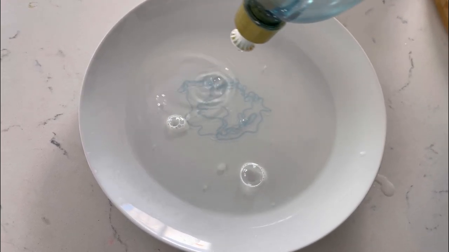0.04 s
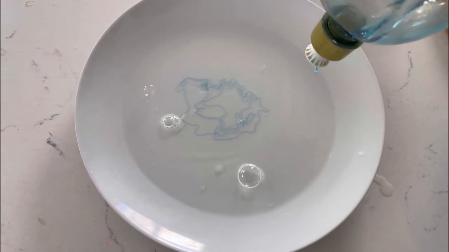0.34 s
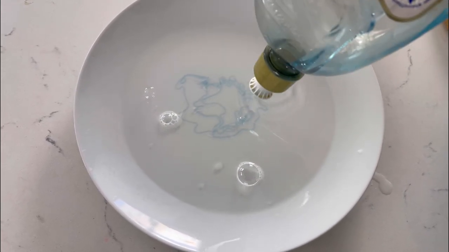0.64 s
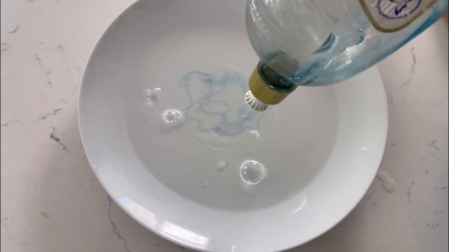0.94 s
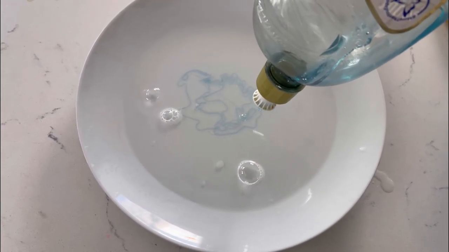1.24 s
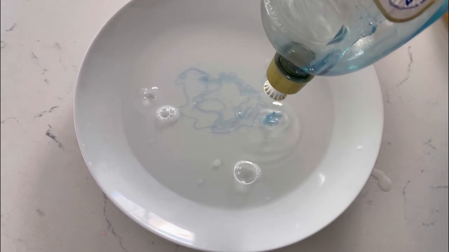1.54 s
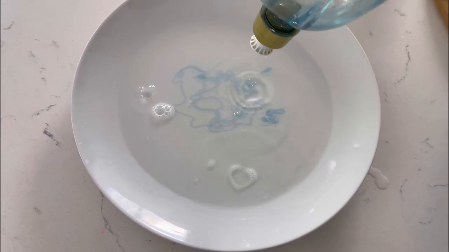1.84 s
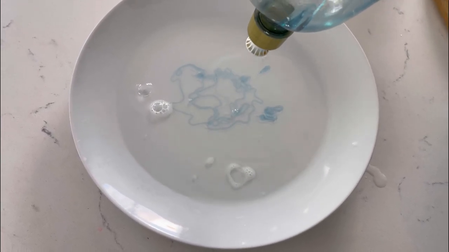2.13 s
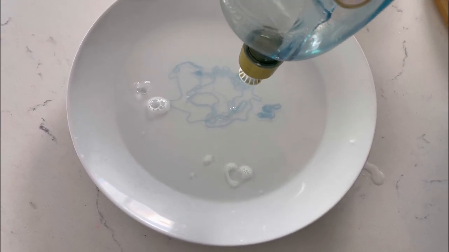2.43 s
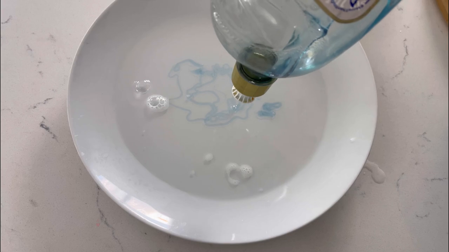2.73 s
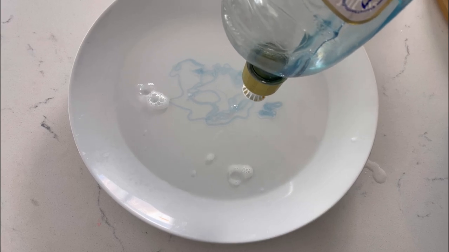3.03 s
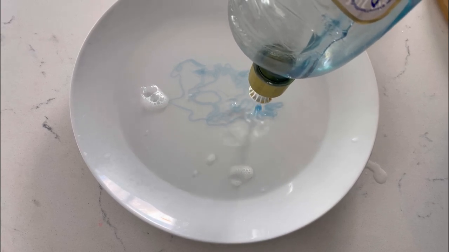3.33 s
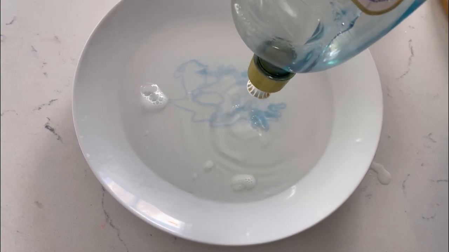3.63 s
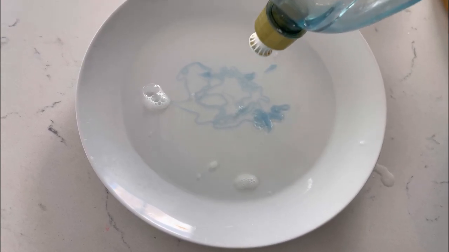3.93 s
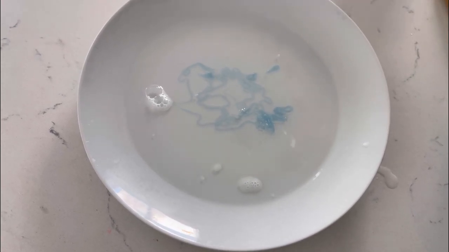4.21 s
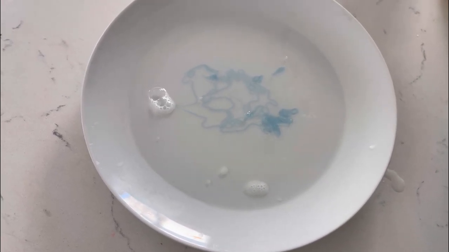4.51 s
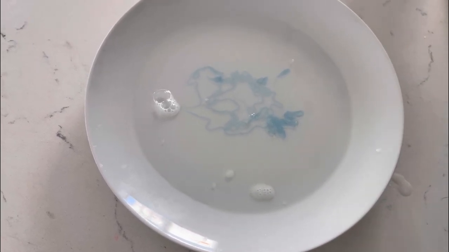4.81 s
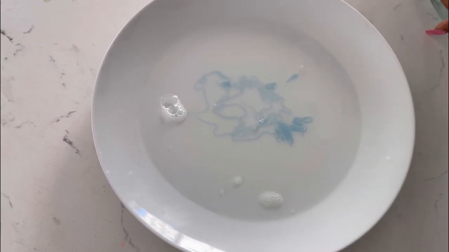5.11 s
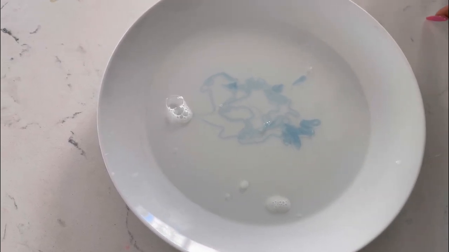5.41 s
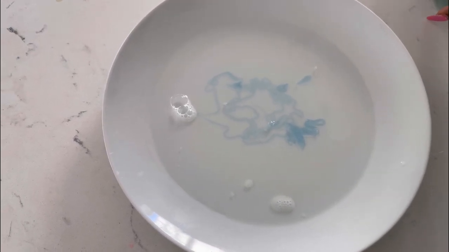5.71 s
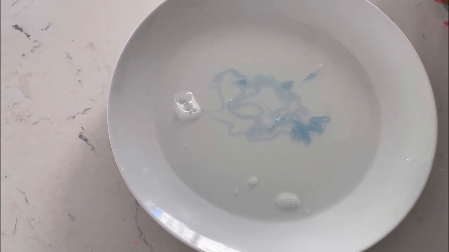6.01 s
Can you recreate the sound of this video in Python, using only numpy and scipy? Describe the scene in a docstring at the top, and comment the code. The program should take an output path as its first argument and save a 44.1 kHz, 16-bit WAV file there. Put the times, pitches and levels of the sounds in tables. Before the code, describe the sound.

In a kitchen with a faint low rumble, soap and air spit from a plastic bottle into shallow water, very near the microphone. The bottle wall gives dull pops and one loud click before a second, crackling squirt. As the grip eases, air hisses and whistles thinly back in. The bottle is set down on the counter with a thud, and a few more hollow knocks follow as another is bumped.

```python
"""At a kitchen counter, a nearly empty plastic bottle of washing-up liquid is squeezed over a plate of water.
Close to the microphone, soap and air sputter from the nozzle and churn the water, and the thin wall
buckles with dull pops. As the grip eases, air is drawn back in, hissing and whistling in the slit.
The bottle is set down and another is knocked about; each impact rings the modes of the counter.
Short reflections and a low background rumble surround it all."""
import sys
import numpy as np
from scipy import signal
from scipy.fft import rfft, irfft
from scipy.io import wavfile
from scipy.ndimage import uniform_filter1d, map_coordinates

SR = 44100
rng = np.random.default_rng(int(sys.argv[2]) if len(sys.argv) > 2 else 0)


def inscribe(sig):
    """Save sig as 16-bit PCM at rate SR to the path in sys.argv[1].

    A 1-D sig is mono; a 2-D sig holds one channel per row.
    Samples are clipped to [-1, 1] before scaling.
    """
    pcm = np.round(np.clip(np.atleast_2d(sig).T, -1, 1) * 32767)
    wavfile.write(sys.argv[1], SR, pcm.astype(np.int16))


N = 266893
TIME, HZ = np.arange(N) / SR, np.fft.rfftfreq(N, 1 / SR)
BAND_LIMIT_HZ = 15900

# squeezes of the bottle: start_s, length_s, full_pressure_s, soap_db, air_db
SQUEEZES = [(0, .13, 0.0024, -53, -57.5), (1.431, 0.033, 0.071, -28.5, -32),
            (1.509, 0.34, 0.01, -27, -27.5), (3.267, 0.47, 0.11, -27.5, -26.5)]
# hollow resonances of the neck: centre_hz, width_hz, boost_db
NECK_MODES = [(316, 220, 15), (825, 45, 12), (3500, 20, 6.5), (3940, 110, 13.5), (5850, 600, -3.5)]
# spectra of the sputtering soap and the escaping air: frequency_hz, level_db
SPUTTER_SPECTRUM = [(50, -37), (130, -4), (300, -1.5), (600, -0.5), (1300, -3.5), (2200, -7), (4500, -10.5),
                    (7000, -15.5), (10000, -10.5), (16000, -39)]
HISS_SPECTRUM = [(1000, -27), (3000, -13.5), (5300, -15), (7200, -5), (8500, 1), (9800, 2), (11500, -6.5),
                 (13500, -9), (16000, -26)]
# soap films bursting in the nozzle: start_s, level_db, pitch_hz
FILM_BURSTS = [(3.2691, -8, 8500), (3.3502, 0, 4550), (3.355, -3.5, 5700), (3.3782, -3, 7000),
               (3.417, -3, 7150), (3.4425, -6, 6000)]
# buckles of the wall: start_s, thud_db, thud_hz, sag_exponent, click_db
BUCKLES = [(0.2861, -25, 254.7, 0.04, -54.5), (.802, -28.5, 249, 0.01, -48.5), (0.885, -35, 183, 0.42, -70),
           (1.883, -32, 126, 0.66, -46), (1.9287, -31.5, 131, 0.62, -66), (2.125, -24, 208, 0.23, -47.5),
           (2.732, -22, 191.5, 0, -56.5), (2.7517, -12.5, 241.7, 0.01, -12.5), (3.067, -42, 559, 0.03, -84)]
# dry ticks of the plastic: start_s, level_db, pitch_hz
TICKS = [(0.2843, -54, 8500), (0.3256, -53.5, 8800), (0.729, -44.5, 2800), (1.8822, -34, 5000),
         (2.7367, -48, 7000), (2.7485, -16, 1690), (2.75, -30.5, 6010), (3.909, -44.5, 1900),
         (5.0494, -36.5, 7630), (5.434, -51, 2550), (5.7787, -39, 1965)]
# short sips of air: start_s, length_s, lower_db, lower_first_hz, lower_last_hz, upper_db
SIPS = [(1.86, 0.082, -50.5, 7700, 7500, -57.5), (2.329, 0.17, -54, 5400, 5000, -49),
        (2.369, 0.055, -47.5, 6000, 2056, -84), (3.878, 0.033, -56.5, 6700, 6500, -61.5),
        (5.263, 0.11, -50.5, 5940, 5660, -53.5)]
# long intake through the nozzle's two resonances: time_s, lower_relative_db, upper_relative_db
INTAKE_LEVELS = [(4.08, -75, -96), (4.12, -60, -70), (4.178, -61, -72), (4.28, -55, -49.5),
                 (4.308, -48.5, -55.5), (4.428, -64.5, -64.5), (4.47, -49.5, -52.5), (4.53, -53.5, -59.5),
                 (4.622, -50, -44.5), (4.644, -50.5, -35.5), (4.72, -49.5, -34.5), (4.794, -45, -44.5),
                 (4.864, -48.5, -39), (5.01, -55, -70), (5.026, -59.5, -61.5), (5.22, -68.5, -91)]
# glide of the lower resonance: time_s, centre_hz
INTAKE_GLIDE = [(4.1, 7990), (4.47, 7300), (4.592, 5780), (4.702, 6750), (4.724, 7260), (4.95, 7430),
                (5.2, 5450)]
# spectra of the broad rush and high fizz of inflowing air: frequency_hz, level_db
RUSH_SPECTRUM = [(100, -7), (600, 6.5), (1500, -2.5), (3200, 4), (4800, -2), (7000, 2.5), (10000, -6.5),
                 (12000, -22.5), (16000, -45)]
FIZZ_SPECTRUM = [(7000, -47), (10500, 5), (13000, -1.5), (16000, -27)]
# edge tones of the slit: middle_s, half_length_s, pitch_hz, glide_hz_per_s, level_db
WHISTLES = [(2.449, 0.0056, 5070, -2800, -43), (4.161, 0.037, 3998, 15, -46),
            (4.282, 0.037, 3997, 3.5, -46.5), (4.367, 0.043, 3992, -2, -63), (4.52, .05, 6700, -12000, -62),
            (4.936, 0.01, 2850, -2500, -55.5), (5.107, 0.03, 4500, -12000, -72)]
# bottles striking the counter: start_s, thud_db, thud_hz, swell_s, crack_db, crack_hz, tick_db, ring_db
KNOCKS = [(4.651, -6, 290.6, 0.0057, -12, 1077, -60, -15), (5.125, -26.5, 288, 0.007, -32, 700, -58, -47),
          (5.2567, -8.5, 356, .0036, -7.5, 770, -17.5, -36.5),
          (5.5849, -13.5, 268, 0.0056, -15, 772, -18, -51), (5.6119, -17.5, 131, 0.0082, -9, 833, 3, -24),
          (6.007, -47.5, 400, 0.0057, -39, 810, -73, -47)]
# modes of the counter and plate: pitch_hz, level_db, t60_s
COUNTER_MODES = [(183.2, 2.5, 0.18), (313.4, 7, 0.091), (630, -7.5, 0.1), (672, -9, 0.071),
                 (819, -2.5, 0.12), (1150, -1, 0.043), (1530, -44, 0.57), (2190, -22.5, 0.15)]
# weak top octave of struck plastic: frequency_hz, gain_db
KNOCK_ROLLOFF = [(10300, -2), (12000, -20), (16000, -35.5)]
# spectrum of things sliding on the counter: frequency_hz, level_db
RUB_SPECTRUM = [(40, -5), (130, 7), (350, 6), (700, -4), (1500, -16), (4000, -31.5), (12000, -26)]
# the jet churning the water: start_s, length_s, level_db
GURGLES = [(1.533, 0.16, -38), (3.407, 0.11, -45.5), (3.532, 0.044, -37.5), (3.598, 0.023, -36.5)]
# reverberation time of the kitchen: frequency_hz, t60_s
ROOM_DECAY = [(100, 1), (300, 0.84), (1000, 0.47), (4000, 0.58), (9000, 0.12), (16000, 0.34)]
# spectrum of the background rumble: frequency_hz, level_db
RUMBLE_SPECTRUM = [(12, -63.5), (20, -28), (34, -14.5), (49, 1), (82, -4.5), (115, -1), (135, -6.5),
                   (249, -8), (367, -19.5), (555, -25), (733, -24.5), (1310, -36), (3270, -49),
                   (15000, -57)]
# phase between the microphone ports: frequency_hz, left_lead_rad
PORT_PHASE = [(0, 0), (520, -.2), (780, -1.6), (1120, 0), (2000, .1), (2800, 1), (4000, .6), (4500, 1.3),
              (5400, 5.7), (6200, 6.5), (9500, 9.42), (12000, 12.5), (13500, 12.7), (15200, 15.6)]
# balance of the ports: frequency_hz, left_minus_right_db
PORT_BALANCE = [(100, -1.5), (500, -2), (850, -4), (1500, -2), (3500, -1.5), (4800, -4.5), (6000, -1),
                (16000, 0.5)]


def squirts(drops_per_s=1200, spread_db=3, flutter_db=1.5, pocket_hz=3400, wet_slit_hz=6100):
    """Jet break-up: soap tears into droplets that ring the neck; as it runs out, turbulent hiss is left."""
    soap, air = nozzle_flows()
    sizes = gain_of(spread_db * np.minimum(rng.exponential(1, N), 4)) * rng.choice([-1, 1], N)
    drops = unit_rms(sizes * (rng.random(N) < drops_per_s / SR))
    neck_db = sum(db / (1 + (2 * (HZ - hz) / width) ** 2) for hz, width, db in NECK_MODES)
    sputter = colour(drops + 0.54 * rng.standard_normal(N), curve_at(SPUTTER_SPECTRUM, HZ) + neck_db)
    # air pockets between the soap films keep changing size and pitch
    sputter += gain_of(-10) * resonate(drops, pocket_hz * np.exp(0.34 * drift(25)), width_hz=700)
    # the slit resonates higher as it blows itself dry
    dryness = (air / (air + soap + 1e-12)) ** 8
    slit_hz = wet_slit_hz * (1 + np.minimum(dryness, 0.25))
    slit = resonate(rng.standard_normal(N), slit_hz, width_hz=1100)
    # the top of the hiss needs full pressure and goes first
    hiss = dulled(noise(HISS_SPECTRUM), (air / air.max()) ** 0.75, corner_hz=12000)
    choking = unit_rms(gain_of(flutter_db * drift(60)))  # soap blocks and frees the opening
    return soap * sputter * choking + air * (hiss + gain_of(-7) * slit) * np.sqrt(choking)


def nozzle_flows(soap_fall_db_per_s=102, air_fall_db_per_s=56.5):
    """Pressure-driven flow: soap and air hold steady, then decay exponentially, the soap sooner."""
    soap, air = np.zeros(N), np.zeros(N)
    for start, length, full_pressure_s, soap_db, air_db in SQUEEZES:
        grip = envelope(start, length, attack_s=0.002, release_s=0.045 * length)
        falling_s = np.maximum(TIME - start - full_pressure_s, 0)
        soap += grip * gain_of(soap_db - soap_fall_db_per_s * falling_s)
        air += grip * gain_of(air_db - air_fall_db_per_s * falling_s)
    return soap, air


def film_bursts(puff_db=-17):
    """Film rupture: each bursting soap film gives a sharp spit and frees a low puff of air."""
    out = np.zeros(N)
    for start, db, hz in FILM_BURSTS:
        add(out, start, gain_of(db) * snap(hz, decay_s=0.00079, q=2.2, top_hz=11500))
        add(out, start, gain_of(db + puff_db) * snap(600, decay_s=0.0071, q=0.8, top_hz=5000))
    return out


def wall_pops(swell_cycles=1.8, click_ratio=4.8, click_lead_s=0.0027):
    """Buckling: the wall ticks and pops, short bending waves running ahead of each thud as a click."""
    out = np.zeros(N)
    for start, db, hz, sag, click_db in BUCKLES:
        add(out, start, gain_of(db) * thud(hz, swell_cycles / hz, sag))
        click = thud(click_ratio * hz, swell_s=0.0012, sag=0.033)
        add(out, start - click_lead_s, gain_of(click_db) * click)
    for start, db, hz in TICKS:
        add(out, start, gain_of(db) * snap(hz, decay_s=0.0011, q=1.2, top_hz=min(2.6 * hz, 10800)))
    return out


def intake(upper_hz=10150, width_hz=2200, fade_start_s=4.52, fade_db_per_s=100, flutter_db=1.35):
    """Elastic recoil: the wall pulls air through two resonances of the nozzle, the lower one gliding."""
    times, lower_curve, upper_curve = np.transpose(INTAKE_LEVELS)
    lower_flow, upper_flow = gain_curve(times, lower_curve + 5), gain_curve(times, upper_curve + 8)
    lower_hz = np.interp(TIME, *np.transpose(INTAKE_GLIDE))
    lower = lower_flow * resonate(rng.standard_normal(N), lower_hz, width_hz)
    for start, length, lower_db, first_hz, last_hz, upper_db in SIPS:
        sip = envelope(start, length, attack_s=0.045, release_s=0.02)
        sip_hz = np.interp(TIME, [start, start + length], [first_hz, last_hz])
        lower += gain_of(lower_db) * sip * resonate(rng.standard_normal(N), sip_hz, width_hz)
        lower_flow += gain_of(lower_db) * sip
        upper_flow += gain_of(upper_db) * sip
    # the highest fizz fades and the intake's hiss grows duller toward its end
    brightness = gain_of(-fade_db_per_s * np.maximum(TIME - fade_start_s, 0))
    upper = resonate(rng.standard_normal(N), np.full(N, upper_hz), width_hz)
    upper += gain_of(-3) * brightness * noise(FIZZ_SPECTRUM)
    rush = gain_of(-8) * noise(RUSH_SPECTRUM)
    direct = dulled(lower + upper_flow * upper + lower_flow * rush, brightness, corner_hz=11400)
    return with_counter_echo(direct) * gain_of(flutter_db * drift(31))


def whistles(octave_db=-14):
    """Edge tones: air in the slit oscillates at a slightly unsteady pitch, with a weak octave."""
    out, waver = np.zeros(N), 1 + 0.005 * drift(300)
    for middle, half_length, hz, glide, db in WHISTLES:
        t = TIME - middle
        phase = 2 * np.pi * np.cumsum((hz + glide * t) * waver) / SR
        tone = unit_rms(np.sin(phase) + gain_of(octave_db) * np.sin(2 * phase))
        out += gain_of(db) * np.exp(-(t / half_length) ** 4) * tone
    return out


def knocks(detune=0.055):
    """Impact excitation: the base cracks on stone, the bottle thuds and the counter's modes ring on."""
    out, t = np.zeros(N), np.arange(SR) / SR
    for start, thud_db, thud_hz, swell_s, crack_db, crack_hz, tick_db, ring_db in KNOCKS:
        ring = np.zeros(SR)
        for hz, db, t60 in COUNTER_MODES:
            spot_hz = hz * (1 + detune * rng.uniform(-1, 1))  # each spot rings a little differently
            ring += gain_of(db - 60 * t / t60) * np.sin(2 * np.pi * spot_hz * t)
        add(out, start, gain_of(thud_db) * thud(thud_hz, swell_s, sag=0.17))
        add(out, start, gain_of(crack_db) * thud(crack_hz, swell_s=0.002108, sag=0.33))
        add(out, start, gain_of(crack_db - 2) * snap(crack_hz, decay_s=0.0042, q=4.7, top_hz=9720))
        add(out, start, gain_of(tick_db) * snap(7200, decay_s=0.00037, q=0.4, top_hz=11700))
        add(out, start, gain_of(ring_db) * ring * (1 - np.exp(-t / 0.003)))
    return out


def gurgles(low_hz=280, high_hz=560, each_size_per_s=14, decay_s=0.006, rise_per_s=5):
    """Bubble resonance: each size rings a short note that rises as the bubble nears the surface."""
    t, water = np.arange(SR // 16) / SR, np.zeros(N)
    for hz in np.geomspace(low_hz, high_hz, num=16):
        bubble = np.exp(-t / decay_s) * np.sin(2 * np.pi * hz * t * (1 + rise_per_s * t)) / hz
        water += signal.oaconvolve(rng.random(N) < each_size_per_s / SR, bubble)[:N]
    churning = sum(gain_of(db) * envelope(start, length, attack_s=0.043, release_s=0.012)
                   for start, length, db in GURGLES)
    return unit_rms(water) * churning


def scuffs(start_s=4.996, length_s=0.74):
    """Sliding friction: hands shift things on the counter with a low, uneven rub."""
    rub = noise(RUB_SPECTRUM) * gain_of(3 * drift(30))
    return gain_of(-44.5) * envelope(start_s, length_s, attack_s=0.35, release_s=0.089) * rub


def with_counter_echo(direct, rest_m=0.08, lift_s=4.2, lift_m_per_s=0.2, sway_m=0.003, reflection=0.45):
    """Comb filtering: the echo off the counter lags more as the bottle rises, so the peaks slide down."""
    height_m = rest_m + lift_m_per_s * np.maximum(TIME - lift_s, 0) + sway_m * drift(7.8)
    delay_samples = 2 * height_m / 343 * SR
    echo = reflection * map_coordinates(direct, [np.arange(N) - delay_samples], order=3)
    return (direct + echo) / 2


def reverberation(x, reflections_per_s=4000, stereo_width=0.89):
    """Diffuse field: dense reflections die at each band's own rate; the bass is alike at both ports."""
    taps = rng.standard_normal((2, SR)) * (rng.random((2, SR)) < reflections_per_s / SR)
    hz, frame_s, bands = signal.stft(taps, SR, nperseg=256)
    bands[1] *= (stereo_width * hz ** 2 / (hz ** 2 + 500 ** 2))[:, None]
    bands *= gain_of(-60 * frame_s / curve_at(ROOM_DECAY, hz)[:, None])
    tail = signal.istft(bands, SR, nperseg=256)[1][:, :SR]
    t = np.arange(SR) / SR
    # the counter and nearby wall answer first and loudest
    tail *= np.clip(t / 0.0013, 0, 1) * (1 + 3.8 * np.exp(-t / 0.034))
    mid, side = signal.fftconvolve(x[None], tail / np.linalg.norm(tail[0]), axes=1)[:, :N]
    return np.array([mid + side, mid - side])


def rumble(level_db=-55.5):
    """Ambient noise: a steady low rumble, almost fully coherent between the ports."""
    common, left, right = (noise(RUMBLE_SPECTRUM) for _ in range(3))
    return gain_of(level_db) * (common + 0.1 * np.array([left, right]))


def thud(hz, swell_s, sag, roughness=0.15):
    """Dispersion: short bending waves arrive first, so the pitch sags, passing hz at the peak."""
    age = np.arange(SR // 8) / SR / swell_s  # 1 at the peak
    power = 1 - np.clip(sag, 0, 0.8)
    phase = 2 * np.pi * hz * swell_s * (age ** power - 1) / power
    band = signal.butter(4, [hz / 2, 2 * hz], "band", fs=SR, output="sos")
    crumple = unit_rms(signal.sosfilt(band, rng.standard_normal(len(age))))
    return (age * np.exp(1 - age)) ** 2 * (np.sin(phase) + roughness * crumple)


def snap(hz, decay_s, q, top_hz):
    """Transient response: a noise burst excites one broad resonance, cut steeply above top_hz."""
    t = np.arange(SR // 16) / SR
    resonance = signal.iirpeak(hz, max(q, 2.5 * hz / SR), SR)
    burst = signal.lfilter(*resonance, rng.standard_normal(len(t)) * np.exp(-t / decay_s))
    burst = signal.sosfilt(signal.butter(8, top_hz, fs=SR, output="sos"), burst)
    return burst / np.linalg.norm(burst) * np.sqrt(decay_s * SR / 2) / 2


def resonate(x, hz, width_hz):
    """Heterodyning: shift down, smooth and shift back for a resonance that follows the curve hz."""
    carrier = np.exp(2j * np.pi * np.cumsum(hz) / SR)
    lowpass = signal.bessel(3, width_hz / 2, fs=SR, output="sos")
    return unit_rms((carrier * signal.sosfilt(lowpass, x / carrier)).real)


def dulled(x, top_share, corner_hz):
    """Shelving: keeps only a share of what lies above the corner."""
    low = irfft(rfft(x) / (1 + (HZ / corner_hz) ** 24), N)
    return low + top_share * (x - low)


def colour(x, db):
    """Spectral shaping by a gain in dB, scaled to rms 1."""
    return unit_rms(irfft(rfft(x) * gain_of(db), N))


def noise(spectrum):
    """Stationary noise with the given spectrum, rms 1."""
    return colour(rng.standard_normal(N), curve_at(spectrum, HZ))


def drift(rate_hz):
    """Random fluctuation, mostly slower than rate_hz, rms 1."""
    return colour(rng.standard_normal(N), -10 * np.log10(1 + (HZ / rate_hz) ** 4))


def envelope(start_s, length_s, attack_s, release_s):
    """Linear attack, hold and exponential decay."""
    t = TIME - start_s
    return np.clip(t / attack_s, 0, 1) * np.exp(-np.maximum(t - length_s, 0) / release_s)


def gain_curve(times_s, db):
    """Smoothed amplitude through points in dB, silent outside them."""
    gain = gain_of(np.interp(TIME, times_s, db, left=-150, right=-150))
    return abs(uniform_filter1d(gain, size=60))


def curve_at(points, hz):
    """Interpolation on a log-frequency axis."""
    point_hz, values = np.transpose(points)
    return np.interp(np.log(hz + 1), np.log(point_hz + 1), values)


def gain_of(db):
    """Decibels to amplitude."""
    return 10 ** (np.asarray(db) / 20)


def unit_rms(x):
    """Normalisation to rms 1."""
    return x / np.sqrt(np.mean(x ** 2) + 1e-20)


def add(mix, start_s, sound):
    """Superposition of a sound on the mix at start_s."""
    part = mix[max(round(start_s * SR), 0):][:len(sound)]
    part += sound[:len(part)]


def scene():
    """Direct-to-reverberant ratio: the squeezed bottle is near, the knocks farther and more reverberant."""
    near = squirts() + gurgles() + intake() + whistles() + wall_pops() + film_bursts()
    counter = irfft(rfft(knocks() + scuffs()) * gain_of(curve_at(KNOCK_ROLLOFF, HZ)), N)
    room = reverberation(gain_of(-14) * near + gain_of(-9) * counter)
    return near + counter + room + rumble()


def record(dry):
    """Stereo pickup: two ports differ in phase and level, and a low-pass limits the band."""
    left = np.exp(0.5j * curve_at(PORT_PHASE, HZ)) * gain_of(curve_at(PORT_BALANCE, HZ) / 2)
    ports = irfft(rfft(dry) * np.array([left, 1 / left]), N)
    lowpass = signal.firwin(511, BAND_LIMIT_HZ, window=("kaiser", 9), fs=SR)
    return signal.oaconvolve(ports, lowpass[None], "same")


dry = scene()
out = record(dry)
inscribe(out)
```